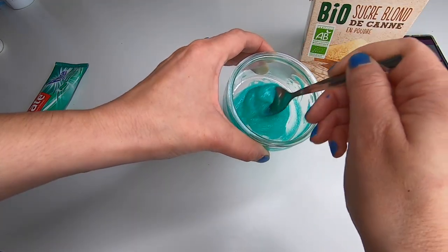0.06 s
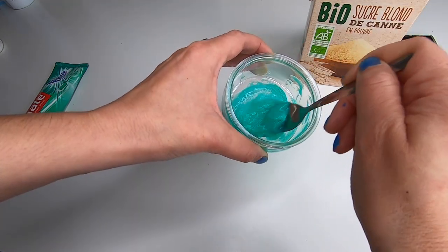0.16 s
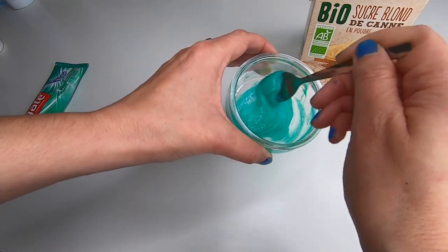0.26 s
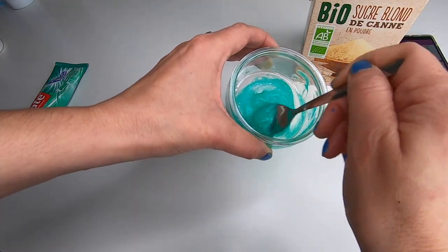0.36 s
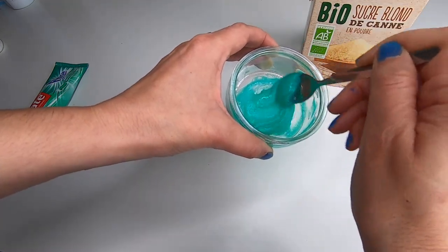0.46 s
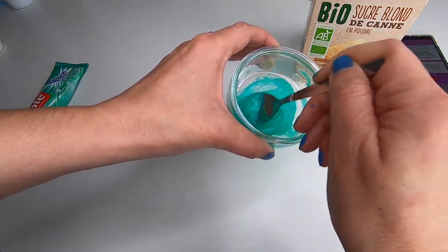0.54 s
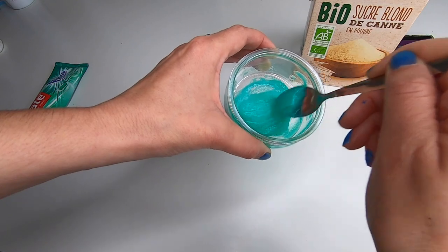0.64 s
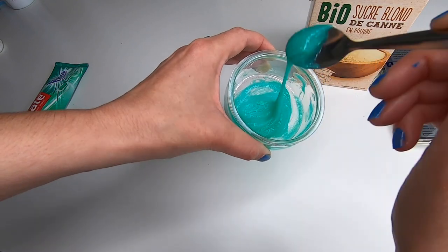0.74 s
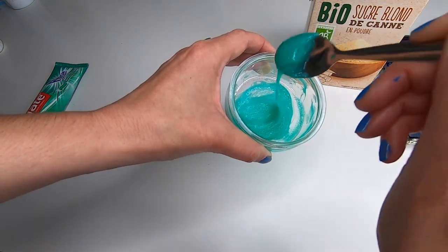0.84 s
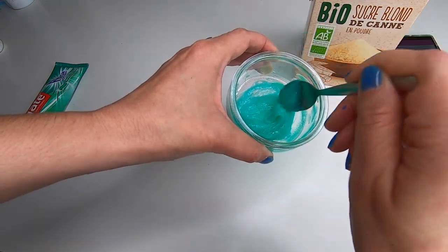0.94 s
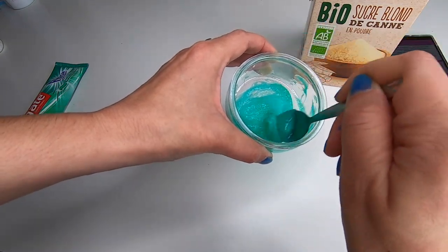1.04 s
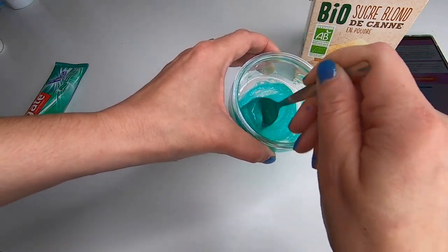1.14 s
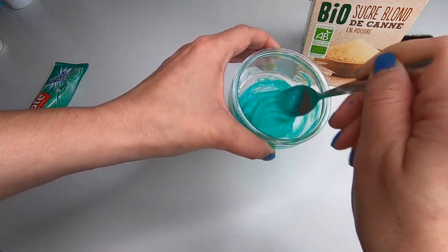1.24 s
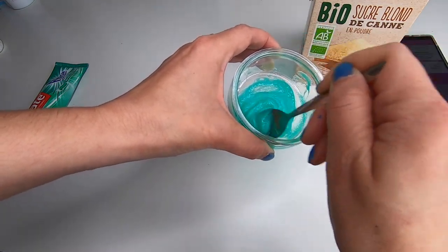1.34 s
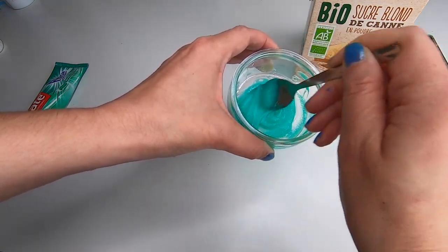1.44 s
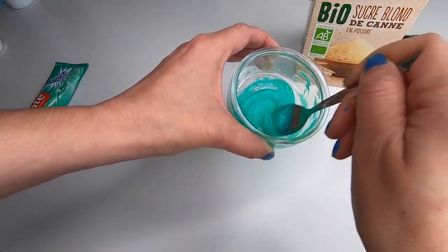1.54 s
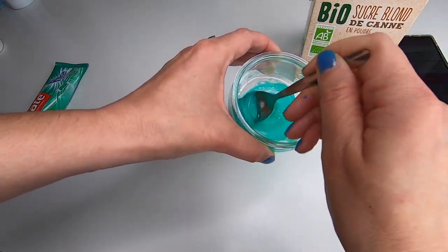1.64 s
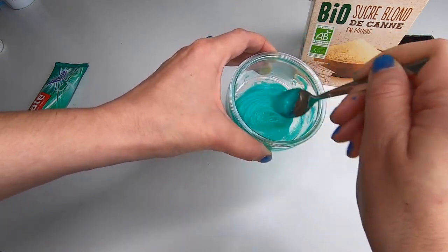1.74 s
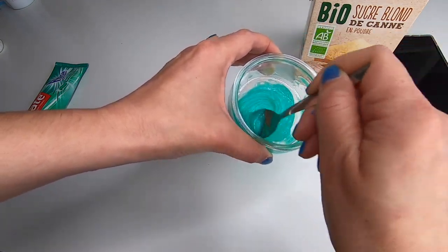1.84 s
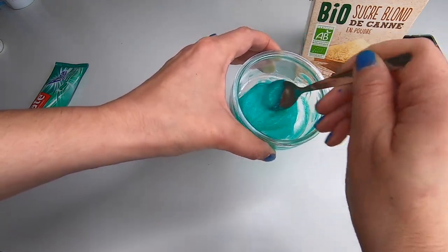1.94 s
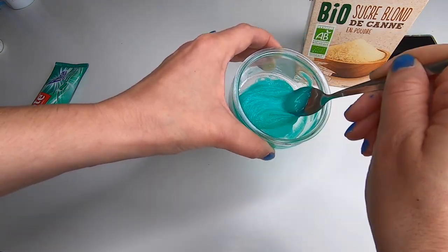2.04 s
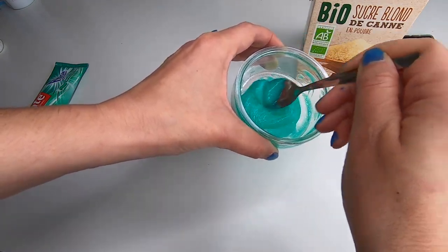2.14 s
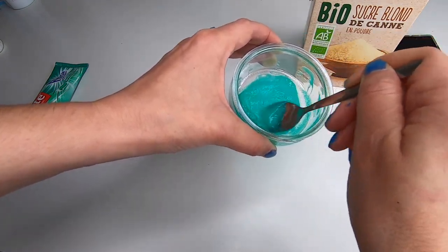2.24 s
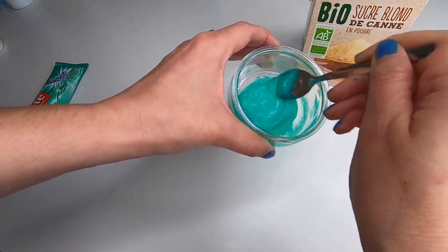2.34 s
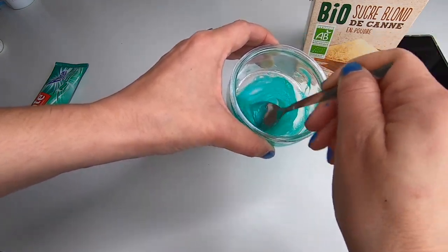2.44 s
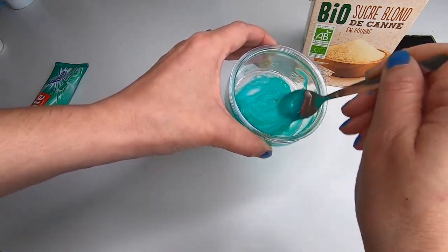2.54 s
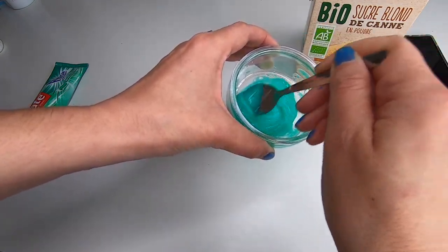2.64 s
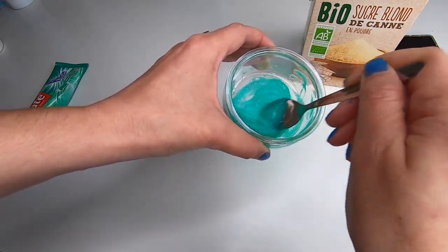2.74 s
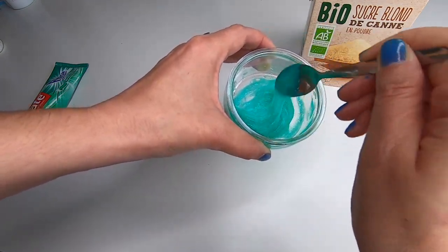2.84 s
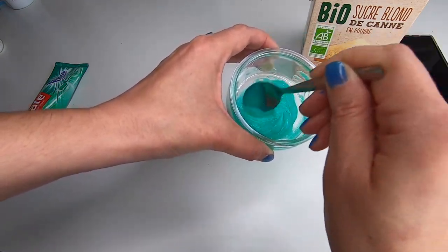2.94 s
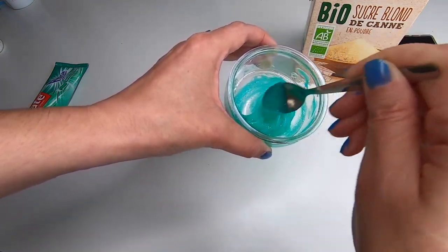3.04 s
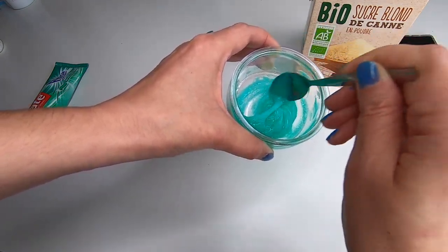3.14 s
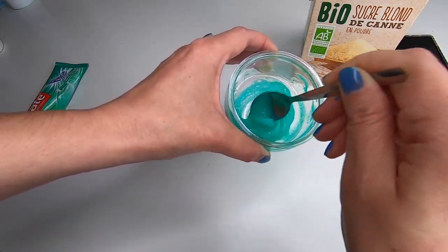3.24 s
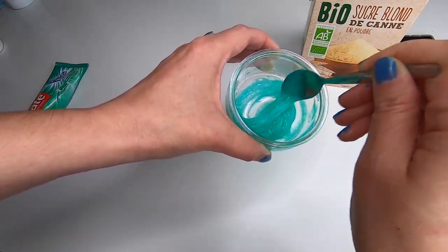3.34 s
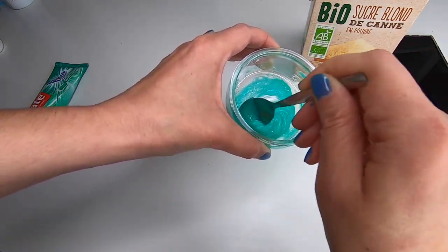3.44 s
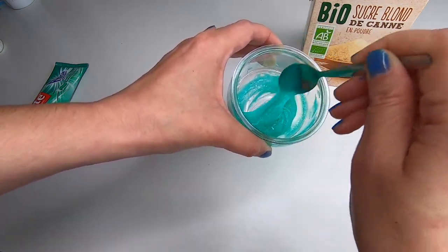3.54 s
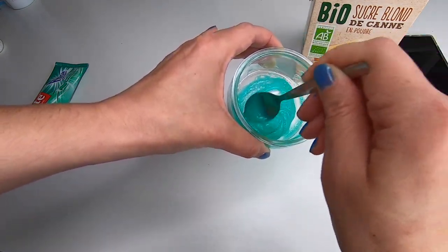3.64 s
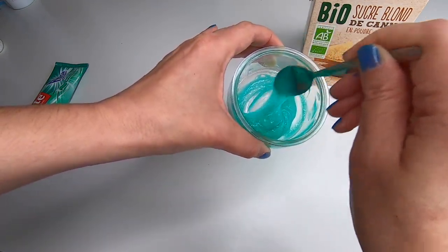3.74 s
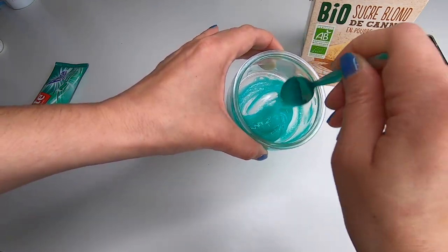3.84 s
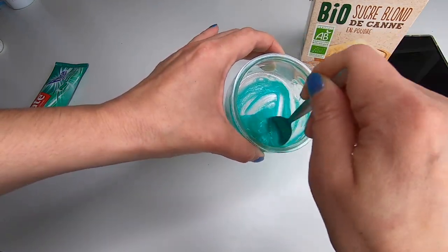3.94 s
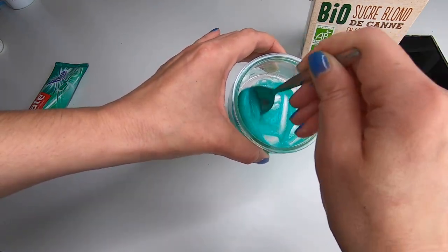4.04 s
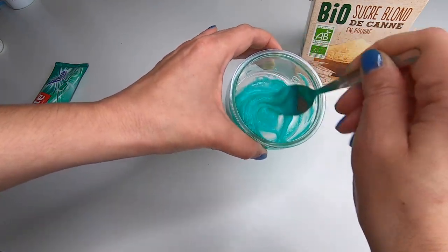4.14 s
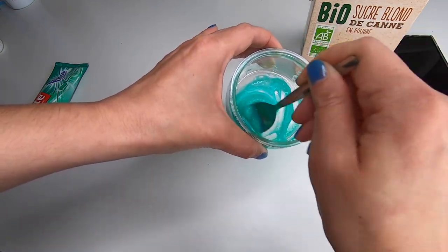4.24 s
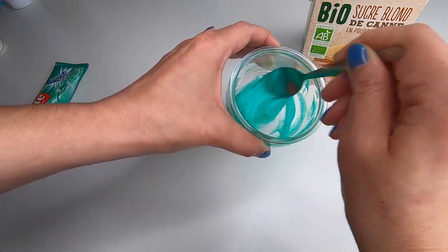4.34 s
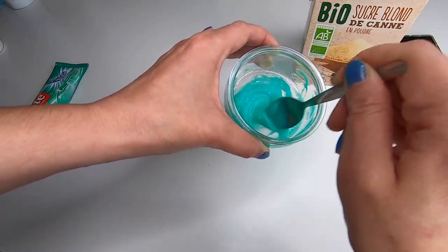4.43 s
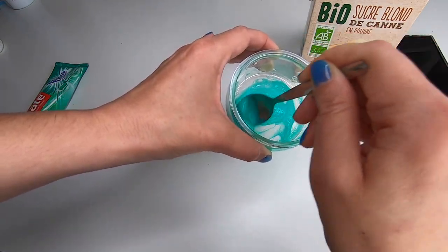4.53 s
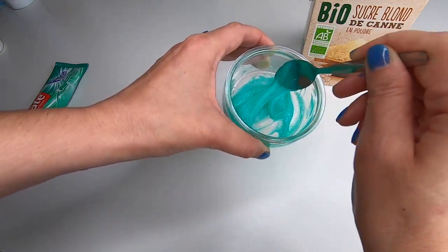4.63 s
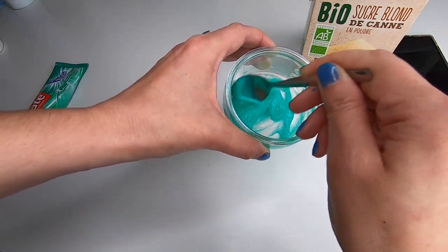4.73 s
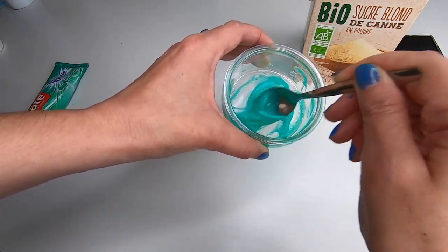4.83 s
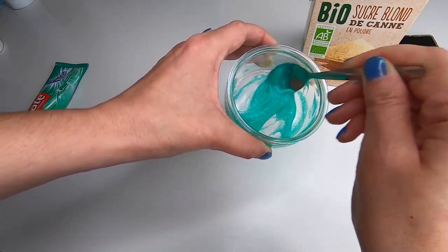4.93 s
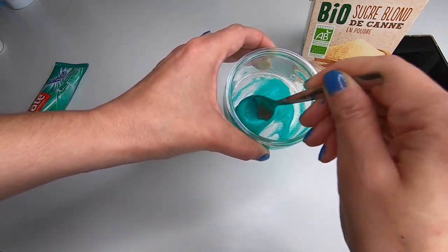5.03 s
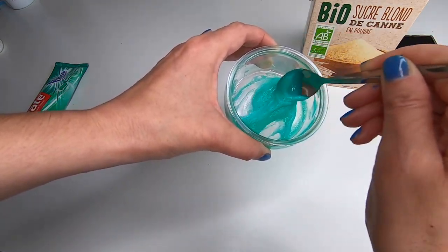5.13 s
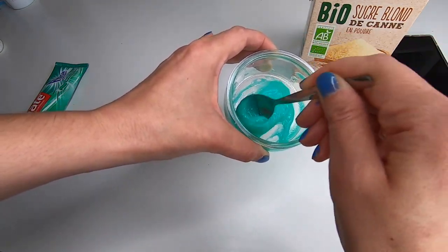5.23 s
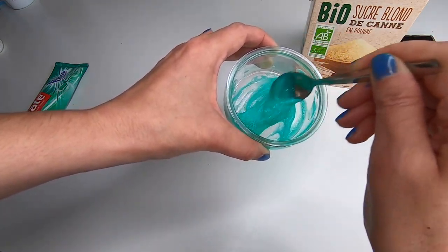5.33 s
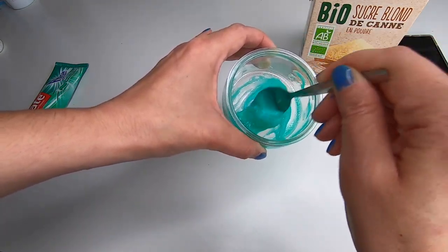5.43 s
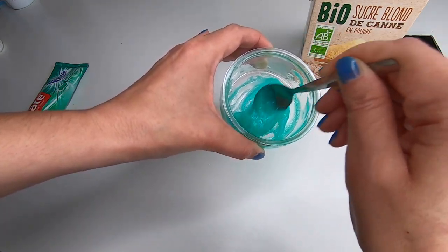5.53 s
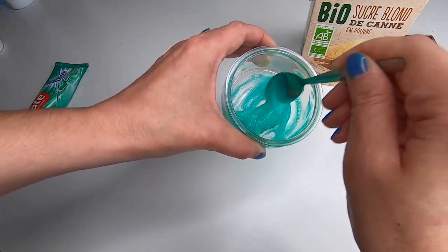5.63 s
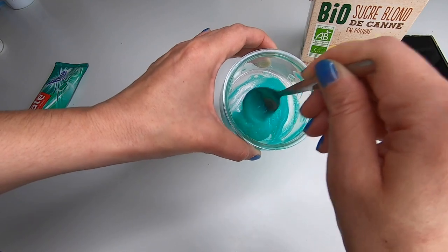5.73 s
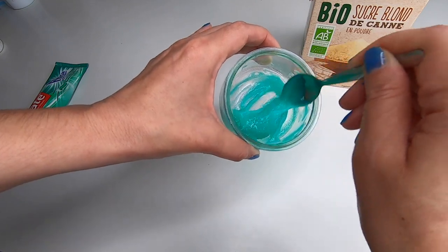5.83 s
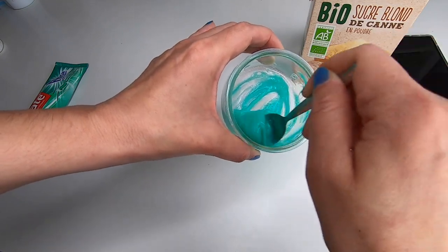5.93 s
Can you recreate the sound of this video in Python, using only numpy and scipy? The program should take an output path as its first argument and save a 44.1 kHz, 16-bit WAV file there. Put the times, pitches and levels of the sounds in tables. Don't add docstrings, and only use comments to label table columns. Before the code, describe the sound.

Close stereo pickup in a small quiet room: soft handling rub and gentle gritty stirring, a brief lull, then a firm glass knock and quick overlapping scrapes with small taps and occasional rim clinks. The second half is more percussive, single damped knocks of spoon on the jar floor, each with a short drag, mixed with bright clinks. Faint room air throughout; an appliance hum around 190 hertz grows over the last second and a half.

```python
import sys
import numpy as np
from scipy import signal
from scipy.fft import rfft, irfft, next_fast_len
from scipy.io import wavfile
from scipy.ndimage import uniform_filter1d, map_coordinates

SR = 44100
rng = np.random.default_rng(int(sys.argv[2]) if len(sys.argv) > 2 else 0)


def makeup_ratio(level_db):
    decades = np.asarray(level_db, float) / 20
    return 10 ** decades


def persist_wave(psi):
    counts = np.round(np.clip(psi, -1, 1) * 32767).astype(np.int16)
    wavfile.write(sys.argv[1], SR, np.atleast_2d(counts).T)


N = 263718

# f/Hz, width/Hz, level/dB
CAVITY = [(930, 190, -18.5), (1382, 178, 4.5), (1815, 304, 7.5), (2090, 327, 3.5)]
WALL = [(2778, 388, 9), (3139, 473, 9), (4270, 700, -12.5)]
BRIGHT = [(4610, 380, -10), (5477, 454, -2), (6050, 280, 0), (6470, 310, -4), (7680, 340, -11)]
# f/Hz, width/Hz, level/dB
FIZZ = [(8920, 1800, 3.5), (11000, 1000, -9), (11060, 1700, -8), (13300, 9300, -6)]
# level over the pressure/dB, share of the bare glass/1, growth with speed/1, pitch rise over a stroke/1
SCRAPE = [(-3, 0.05, .7, .03), (0.1, 0.2, 0.88, 0.18), (-0.34, 0.77, 1.5, 0.087), (0.36, 0.99, 1.52, 0.11),
          (-9, 0.86, 1.7, .03)]


def unit(x):
    return x / np.sqrt(np.mean(x ** 2) + 1e-20)


def along(points, hz):
    f, v = np.transpose(points)
    return np.interp(np.log(hz + 1), np.log(f + 1), v)


def curves(rows):
    s, *cols = np.transpose(rows)
    return [np.interp(np.arange(N) / SR, s, c) for c in cols]


def wobble(rate):
    knots = rng.standard_normal(int(N * rate / SR) + 4)
    return map_coordinates(knots, [np.arange(N) * rate / SR])


def filtered(x, response):
    m = next_fast_len(N + SR // 2)
    return irfft(rfft(x, m) * response(np.fft.rfftfreq(m, 1 / SR)), m)[..., :N]


def resonant(x, modes):
    def response(f):
        total = 0
        for k, (centre, width, db) in enumerate(modes):
            damping = 1j * f * width
            total = total + (-1) ** k * makeup_ratio(db) * damping / (centre * centre - f * f + damping)
        return total
    return filtered(x, response)


def air():
    # f/Hz, level per Hz/dB
    air_spectrum = [(15, -56), (25, -24), (85, -32.5), (195, -5), (253, -17), (552, -33), (612, -29.5),
                    (735, -14), (904, -22.5), (978, -23), (1640, -31.5), (5000, -37), (12500, -50),
                    (16000, -60), (22000, -120)]
    # f/Hz, correlation/1
    port_likeness = [(60, .5), (240, -0.5), (950, -0.5), (3000, .3), (15000, 0.1)]

    def mid_side(hz):
        turn = np.arccos(np.clip(along(port_likeness, hz), -1, 1)) / 2
        return makeup_ratio(along(air_spectrum, hz)) * [np.cos(turn), np.sin(turn)]

    mid, side = filtered(rng.standard_normal((2, N)), mid_side)
    drone = makeup_ratio(-73 + 2.6 * wobble(7)) * unit(resonant(rng.standard_normal(N), [(184.5, 8, 0)]))
    return makeup_ratio(-66) * unit(np.array([mid + side, mid - side])) + drone


def rustle():
    # t/s, level/dB
    rub_level = [(0.0, -64.5), (0.35, -55), (0.77, -88), (1.98, -78.5), (2.63, -80), (3.18, -60),
                 (3.46, -85), (3.71, -78), (4.11, -64.5), (5.09, -73.5), (5.36, -66.5), (5.98, -67.5)]
    rub = resonant(rng.standard_normal((2, N)), [(296, 27, 1.5), (590, 300, -10.5)])
    return makeup_ratio(curves(rub_level)[0] - 9 + 4.0 * wobble(36)) * unit(rub)


def stroke_levels():
    # t/s, length/s, pressure level/dB, bare glass level/dB, share of the way at top speed/1
    sweeps = [(0.0, 0.099, -58.5, -7, 0.31), (0.139, 0.052, -41, -3.5, 0.37), (.2, 0.088, -41, -3.5, 0.78),
              (.355, 0.033, -54.5, -9.5, 0.48), (0.467, 0.032, -36.5, -12.5, .6),
              (.625, 0.088, -45.5, -11, 0.66), (1.159, 0.064, -51.5, -8, 1), (1.22, 0.18, -45.5, -11, 0.54),
              (1.356, 0.11, -41, -6.5, 0.58), (1.485, 0.097, -47.5, -9, 0.48),
              (1.613, 0.084, -38.5, -4.5, 0.58), (1.767, 0.14, -33.5, -10, 1),
              (2.01, 0.098, -36.5, -20, 0.31), (2.142, 0.085, -39.5, -16, 0.49), (2.2, .1, -42, -0.5, 0.38),
              (2.329, 0.023, -43, -13.5, 0.6), (2.365, 0.069, -37.5, -18.5, 0.16),
              (2.446, 0.057, -37, -5.5, 0.23), (2.557, 0.037, -44, -14.5, 0.25),
              (2.601, 0.047, -43, -11.5, 0.88), (2.662, 0.072, -40.5, 0, 0.96),
              (2.811, 0.025, -40, -20, 0.088), (4.142, 0.15, -39.5, -2, 0.73),
              (4.403, 0.077, -38.5, -3.5, 0.66), (4.492, 0.053, -44, 5, 0.52)]
    drags = [(1.055, 0.063, -44, 0.5, 0.29), (1.695, 0.055, -54, -11, .1), (1.924, 0.039, -40.5, -11.5, .1),
             (2.748, 0.021, -48.5, 3, .1), (3.011, 0.055, -43.5, 4.5, 0.297),
             (3.246, 0.032, -46, 6.5, 0.53), (3.467, 0.043, -47.5, 9.5, 0.5),
             (3.699, 0.038, -45.5, 7.5, .35), (3.892, 0.0209, -47.5, -2, .1), (3.945, 0.022, -60, 18, 0.36),
             (4.076, 0.1, -42, -2.5, 0.2), (4.309, 0.012, -51.5, 13.5, .1), (4.583, 0.067, -51.5, 4, 0.091),
             (4.766, 0.077, -41.5, 2, .8), (4.847, 0.022, -47.5, 7, .2), (5.032, 0.076, -39.5, -4, 0.6),
             (5.262, 0.072, -39, -2.5, 0.65), (5.481, 0.073, -40, 0, .9), (5.728, .045, -43, 1.5, 0.61),
             (5.909, 0.039, -49, 2, 1), (5.943, 0.038, -46.5, 8.5, .1)]
    speed_up, slow_down = 65.5, 123.5
    gain, t = np.zeros((2, len(SCRAPE), N)), np.arange(N) / SR
    over_db, share, growth, _ = np.transpose(SCRAPE)[:, :, None]
    for s, length, db, bare_db, top in sweeps + drags:
        grip = np.clip(np.minimum((t - s) / 0.01 + 1, (s + length - t) / 0.0088 + 1), 0, 1)
        span = grip > 0
        late = t[span] - s - top * length
        speed_db = np.minimum(speed_up * late, -slow_down * late)
        climb = np.pi / 2 * np.clip((t[span] - s) / length, 0, 1)
        level = grip[span] * makeup_ratio(db + over_db + share * bare_db + growth * speed_db)
        gain[:, :, span] += np.array([np.cos(climb) * level, np.sin(climb) * level])
    return gain


def patchy(x, depth_db):
    z = signal.stft(x, nperseg=256)[2]
    field = uniform_filter1d(rng.standard_normal(z.shape), size=3, axis=0)
    field = uniform_filter1d(field, size=20, axis=1)
    return signal.istft(z * makeup_ratio(depth_db * unit(field)), nperseg=256)[1][:N]


def slide(grit_db, chatter_db):
    grit = makeup_ratio(grit_db * rng.exponential(size=N)) * rng.standard_normal(N)
    chatter = makeup_ratio(chatter_db * wobble(160) + 0.7 * wobble(41))
    grit = patchy(grit * chatter, depth_db=3.5)

    def shifted(modes, rise):
        return unit(resonant(grit, modes * [1 + rise, 1, 1]))

    lower, upper = np.split(np.array(CAVITY), 2)
    groups = (lower, upper, np.array(WALL), np.array(BRIGHT), np.array(FIZZ))
    total = np.zeros(N)
    for deep, out, modes, row in zip(*stroke_levels(), groups, SCRAPE):
        rise = row[-1]
        total += deep * shifted(modes, -rise / 2) + out * shifted(modes, rise / 2)
    return makeup_ratio(-3.5) * total


def contacts():
    # t/s, peak level/dB, cavity level/dB, bright level/dB
    tap_rows = [(0.11, -57, -2, 14.5), (0.1218, -51.5, 11.5, 1), (0.348, -46, 4.5, -5),
                (0.4527, -51, 9, -5), (0.466, -49, 15.5, -12), (0.6204, -36, 11.5, -7),
                (0.6368, -30, 4.5, -16), (0.6715, -43.5, 8.5, -19), (1.0417, -39.5, -9, -14),
                (1.29, -48.5, 16, 7), (1.3453, -42.5, 7, 8), (1.459, -33, -6, -15), (1.609, -55.5, 24, 23),
                (1.6906, -19, -6, -4), (2.2712, -33, 0, -2), (2.37, -33.5, 8.5, -13),
                (2.4146, -29.5, 1, -7), (2.5118, -32.5, -1, -11), (2.6567, -26.5, 3, -11),
                (2.7482, -30.5, -2, -8), (2.809, -49, 10.5, -12), (4.395, -39.5, 7.5, -13)]
    # t/s, then peak, cavity, bright and free ring level/dB
    clink_rows = [(1.1382, -19, -11, 3.5, -4), (1.5268, -36, -4, -5.5, -17.5),
                  (1.8401, -33.5, 1.5, -2.5, -14.5), (1.9231, -12, -11.5, -5, -15.5),
                  (2.0132, -48.5, 7.5, 2, -4.5), (2.1237, -16.5, -5, -0.5, -15),
                  (3.9563, -25.5, -28.5, -11, -8.5), (3.9968, -10, -18.5, -1.5, -4),
                  (4.0078, -16.5, -10.5, -20, -31.5), (4.0147, -24.5, -17.5, -4.5, 1),
                  (4.062, -29, -3.5, -16.5, -3.5), (4.574, -9, -15.5, -9.5, -17.5),
                  (5.7143, -21, -4.5, -19, -12), (5.896, -23.5, -19, 3.5, -13.5)]
    # t/s, then peak, cavity, bright and base level/dB
    chop_rows = [(1.0521, -10, -8.5, -3.5, -25), (1.2081, -25.5, -3.5, -6, -31.5),
                 (3.008, -19.5, -6.5, -18.5, -18.5), (3.2397, -31.5, 5, 1.5, -3),
                 (3.463, -24.5, -6, 0, -12), (3.6815, -10, -11.5, -6.5, -23.5), (3.8881, -24, 2, -11.5, -6),
                 (4.3054, -14.5, -9.5, -13, -30.5), (4.763, -17.5, -10, -38, -20.5),
                 (4.847, -14, -8.5, -11, -53), (5.028, -19.5, -10.5, -32.5, -22),
                 (5.2572, -15, -10.5, -10.5, -23.5), (5.4619, -11.5, -14.5, -4, -42),
                 (5.4739, -7.5, -11, -6, -27), (5.7157, -11.5, -11.5, -0.5, -22.5),
                 (5.9464, -9.5, -14.5, 1.5, -25)]
    # t/s, peak level/dB
    tick_rows = [
        (0.7107, -46.5),
        (1.372, -33.5),
        (1.505, -38),
        (2.8162, -43),
        (2.8347, -54),
        (4.1877, -32.5),
        (4.5444, -56),
    ]
    tap_ring, chop_ring = -24, -25
    sideways_base = -34.5
    taps = [(*row, tap_ring, sideways_base) for row in tap_rows]
    clinks = [(*row, sideways_base) for row in clink_rows]
    chops = [(*row[:-1], chop_ring, row[-1]) for row in chop_rows]
    ticks = [(s, db, -3, -11.5, tap_ring, sideways_base) for s, db in tick_rows]
    return sorted(taps + clinks + chops) + ticks


def struck(hz, db, t60, chance, t):
    size = makeup_ratio(db + 2.2 * chance[0] - 60 * t[:, None] / t60)
    turn = 2 * np.pi * hz * (1 + 0.013 * chance[1]) * t[:, None] + 1.98 * chance[2]
    onset = 1 - np.exp(-(t / 0.00031) ** 2)
    sound = (size * np.sin(turn)).sum(axis=1) * onset
    return sound / np.max(np.abs(sound))


def knocks():
    # f/Hz, level/dB, t60/s
    ring_modes = [(2370, -11, .07), (2430, -17, .08), (5780, -13, .09), (5920, 0, .065), (6240, -14, .04),
                  (7800, -23, .03), (10470, -19, .04), (13500, -29, .04)]
    # f/Hz, width/Hz, level/dB
    foot_modes = [(324, 250, -12.5), (685, 92, -10), (916, 290, 8)]
    out, base, jolt = np.zeros(N + SR), np.zeros(N + SR), np.zeros(N)
    t = np.arange(SR // 10) / SR
    parts = [np.transpose(p) for p in (WALL, CAVITY, BRIGHT, FIZZ, foot_modes)]
    blows = contacts()
    chance = rng.standard_normal((len(blows), 6, 3, 8))
    for (s, db, cavity_db, bright_db, ring_db, foot_db), luck in zip(blows, chance):
        gains = makeup_ratio([db - 0.5, db + cavity_db + 4.5, db + bright_db, db + bright_db - 19.0, db + foot_db + 3.5])
        sounds = []
        for g, (hz, width, level), c in zip(gains, parts, luck):
            sounds.append(g * struck(hz, level, 3 / width, c[:, :len(hz)], t))
        thud, foot = sum(sounds[:-1]), sounds[-1]
        ring_luck = 0.44 * luck[-1][:, :len(ring_modes)]
        ring = makeup_ratio(db + 1.15 * ring_db + 6.5) * struck(*np.transpose(ring_modes), ring_luck, t)
        at = round((s + .0004) * SR)
        out[at:][:len(t)] += thud + ring
        out[at - round(.011 * SR):][:len(t)] += makeup_ratio(-34.5) * thud
        base[at:][:len(t)] += foot
        jolt[at] = makeup_ratio(db + foot_db + 19)
    table_top = resonant(jolt, [(60, 60, -13), (160, 90, 4.5)])
    return out[:N], base[:N] + table_top


def room(x):
    # f/Hz, t60/s
    room_decay = [(300, 0.43), (2000, 0.27), (6000, 0.29), (12000, 0.32)]
    out, step = np.zeros((2, N + SR)), SR // 4
    early = 150
    for at in range(0, N, step):
        hz, t, z = signal.stft(rng.standard_normal((2, SR // 3)), SR, nperseg=256)
        decay = makeup_ratio(-60 * t / along(room_decay, hz)[:, None])
        tail = signal.istft(z * decay, SR, nperseg=256)[1]
        tail = tail + 0.09 * tail[::-1]
        tail = np.pad(tail / np.linalg.norm(tail[0]), ((0, 0), (early, 0)))
        paths = np.diff(rng.standard_normal(early + 1)) * [[1], [-1]]
        tail[:, :early] = makeup_ratio(-10.5) * paths * makeup_ratio(-60 * np.arange(early) / SR / 0.0037)
        wet = signal.fftconvolve(x[None, at:at + step], tail, axes=1)
        out[:, at:][:, :wet.shape[1]] += wet
    return out[:, :N]


def hum():
    # t/s, f/Hz, level/dB
    hum_course = [
        (4.4, 190.3, -80),
        (4.518, 189.4, -65.5),
        (4.724, 190.4, -72.5),
        (4.958, 191.8, -57),
        (5.442, 193.8, -52.5),
        (5.98, 192.3, -51.5),
    ]
    hz, db = curves(hum_course)
    start = np.clip((np.arange(N) / SR - hum_course[0][0]) / 0.12, 0, 1)
    tone = makeup_ratio(4 + 1.2 * wobble(8)) * np.sin(2 * np.pi * np.cumsum(hz + 1.06 * wobble(6)) / SR)
    murmur = makeup_ratio(-11.5) * unit(resonant(rng.standard_normal((2, N)), [(159, 13.3, 3.5), (228, 36, -4)]))
    return start * makeup_ratio(db) * (tone + murmur)


def scene():
    # f/Hz, left over right level/dB
    port_lean = [(950, 0.0), (2740, 0), (4200, .5), (6400, -1), (9800, 3), (15000, 5.5)]
    # f/Hz, lead/rad
    port_lead = [(4600, 0), (5200, .3), (5800, -.3), (6500, .4), (8100, .4), (9200, 1.5), (10500, -.4),
                 (15500, 0)]
    blows, jolts = knocks()
    jar = blows + slide(grit_db=2.2, chatter_db=1.6)
    jar = jolts + filtered(jar, lambda hz: (1j * hz / (550 + 1j * hz)) ** 3)
    side = np.array([[.5], [-.5]])

    def ports(hz):
        return makeup_ratio(side * along(port_lean, hz)) * np.exp(1j * side * along(port_lead, hz))

    near = filtered(jar, ports)
    return near + makeup_ratio(-9.5) * room(jar) + rustle() + air() + hum()


def band_limit(x):
    return signal.sosfilt(signal.butter(12, 15970, fs=SR, output="sos"), x)


def record(dry):
    heard = filtered(dry, lambda hz: 1 / (1 + (hz / 14000) ** 36))
    return band_limit(heard)


dry = scene()
out = record(dry)
persist_wave(out)
```